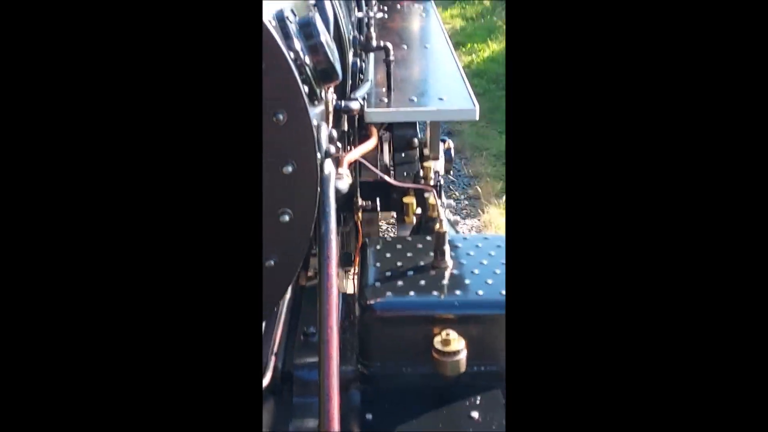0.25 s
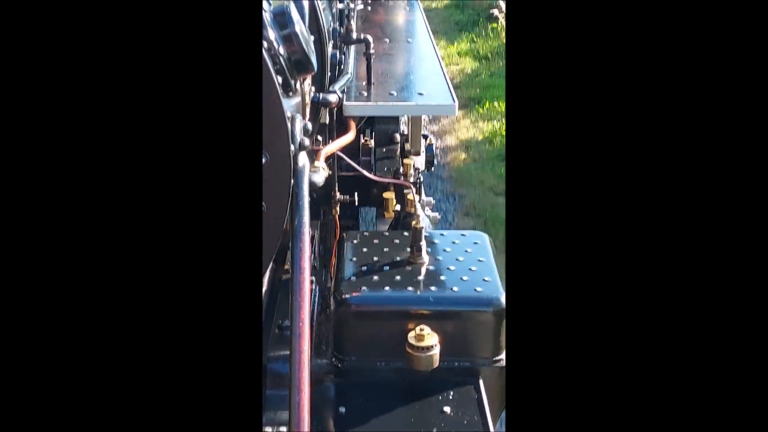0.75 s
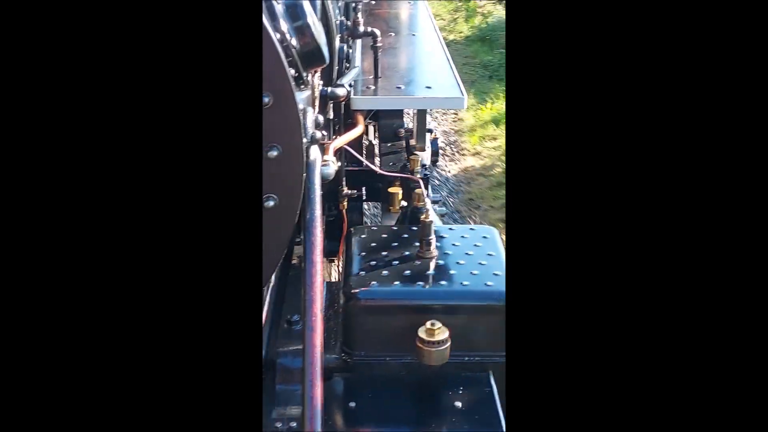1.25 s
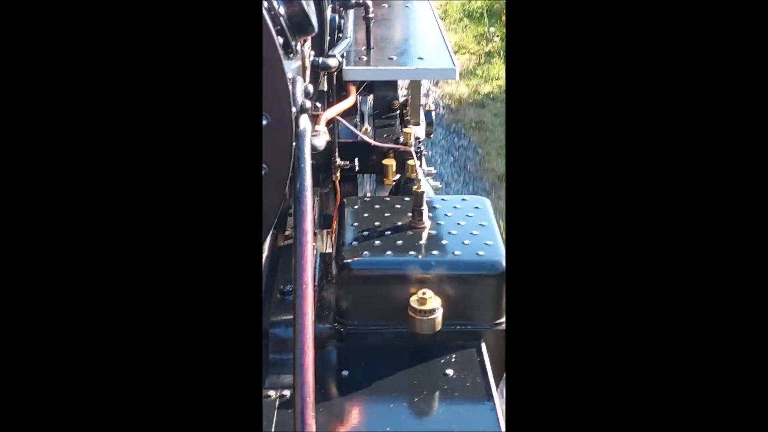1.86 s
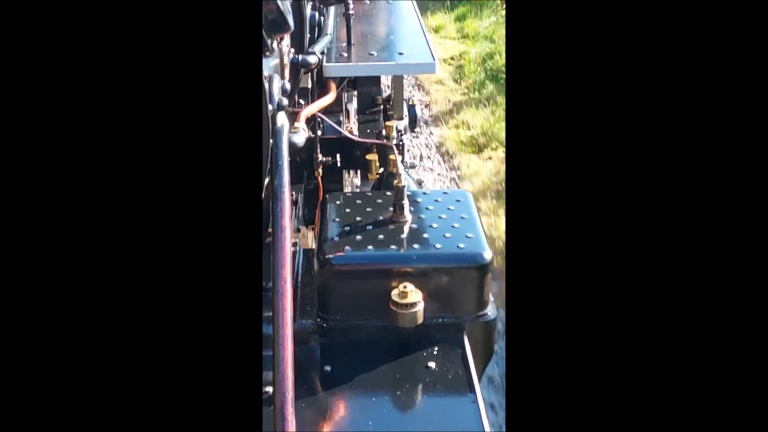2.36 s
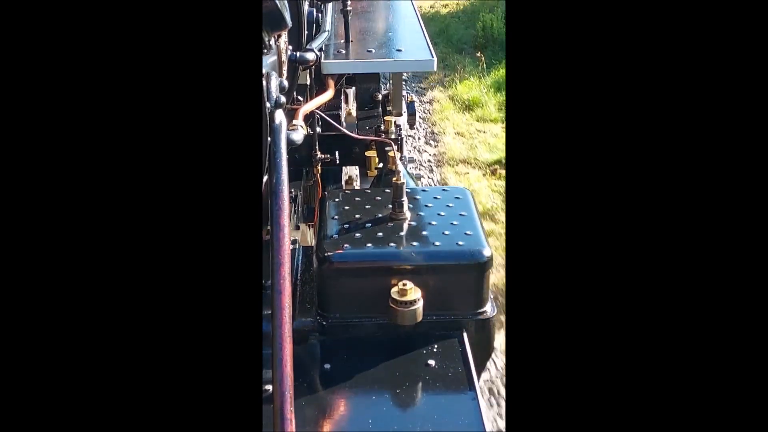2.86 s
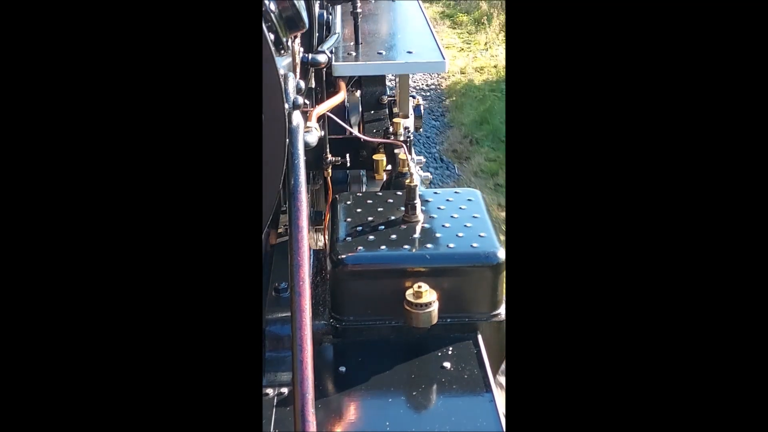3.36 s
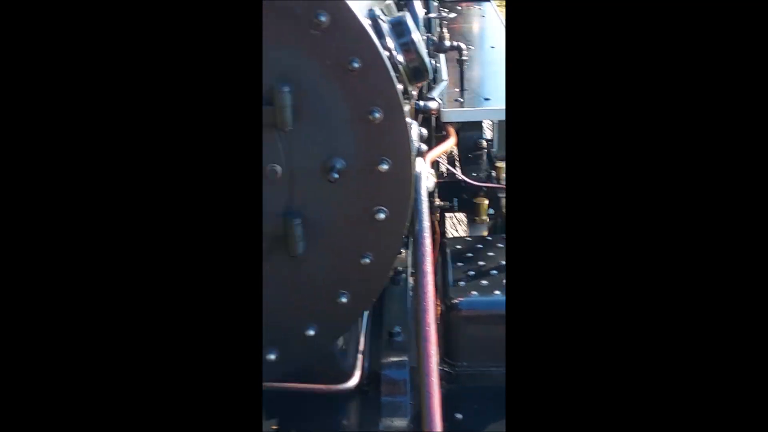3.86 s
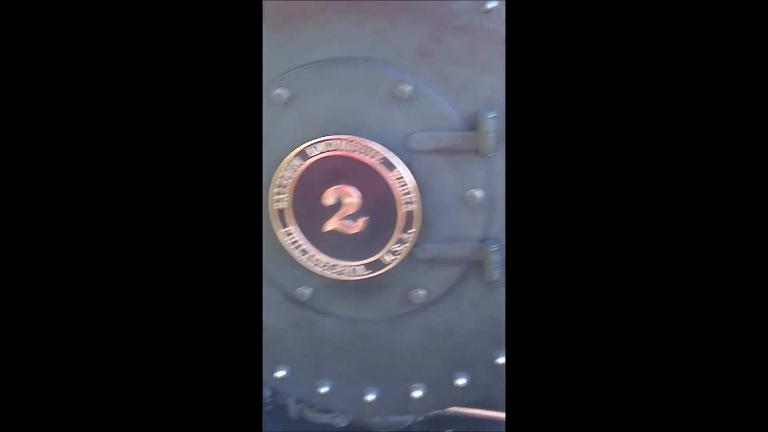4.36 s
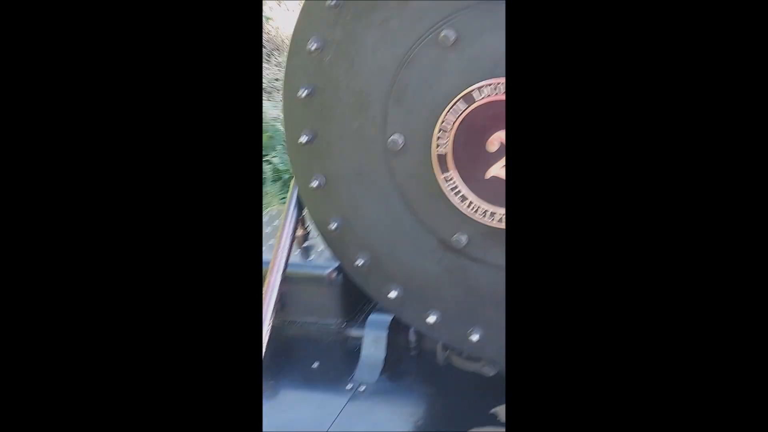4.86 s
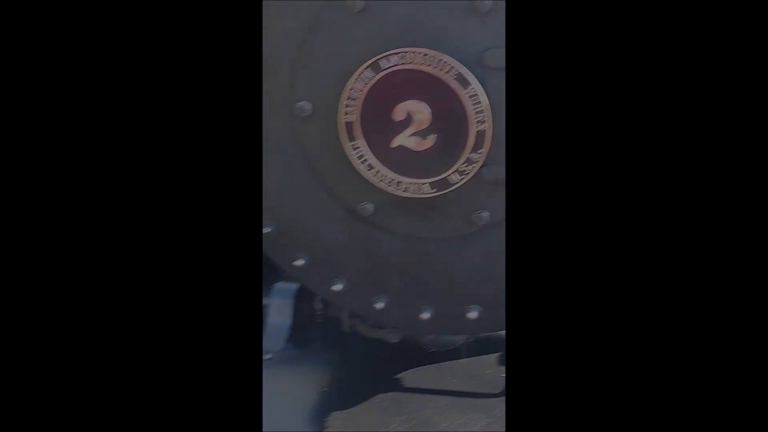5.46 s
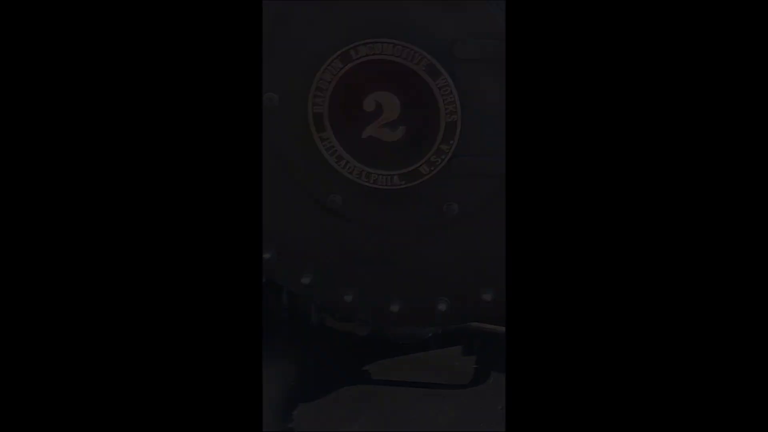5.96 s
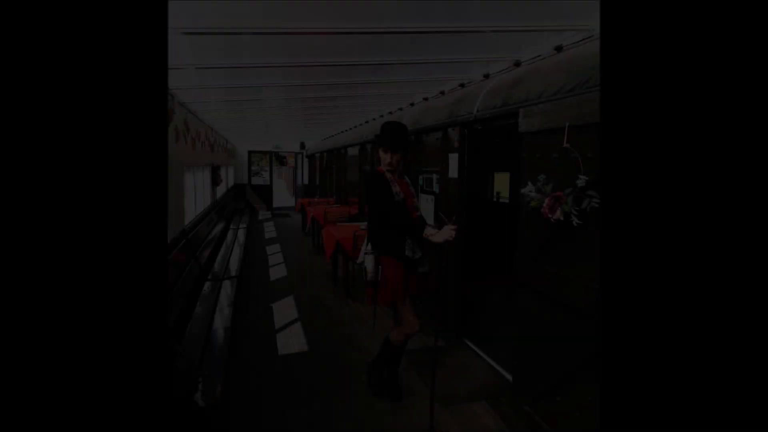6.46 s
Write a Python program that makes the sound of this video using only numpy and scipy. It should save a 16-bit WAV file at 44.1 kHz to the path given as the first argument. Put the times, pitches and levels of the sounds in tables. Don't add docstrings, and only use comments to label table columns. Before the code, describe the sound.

From the start, a small steam engine is already rolling, heard close at its front in open air. Rough wheel roar, busy rod rattle, thin sputtering steam and lumpy frame rumble run continuously. Dull slack bumps lead to hard steel bangs at 0.5-0.9 s, the sharpest near 0.84, then a ringing clank at 1.03 and a loose bracket chattering at 1.15-1.35. Another clattering blow comes around 1.5; rolling swells near 1.8, then eases. Crisp knocks stand out at 2.24, 2.75 with a bright pin-like ping, and 3.2. After that, softer bumps and steam spurts dominate, with a double metallic hit at 4.45. All the while the level fades evenly; from 5 s only faint rumble, hiss and tiny link rattles remain, stopping dead at about 6.06 into silence. The engine is on the right only; the left has faint circuit hiss.

```python
import sys
import numpy as np
from scipy import signal
from scipy.fft import rfft, irfft
from scipy.io import wavfile
from scipy.ndimage import uniform_filter1d

SR = 44100
rng = np.random.default_rng(int(sys.argv[2]) if len(sys.argv) > 2 else 0)


def store_wav(level_fs):
    pcm = np.round(np.clip(np.atleast_2d(level_fs), -1, 1) * 32767)
    wavfile.write(sys.argv[1], SR, pcm.T.astype(np.int16))


N = 295470
T = np.arange(N) / SR
FADE = np.clip(1 - T / 6.25, .01, 1)

# start in [s], peak in [dB], ringing pitch in [Hz], treble in [dB].
JOINTS = [(0.393, -22.5, 423, -3.5), (0.513, -15.5, 386, -13), (0.672, -15, 420, -15),
          (0.72, -15, 610, -13), (0.829, -11, 656, -8), (0.889, -37, 754, -5), (1.027, -15, 420, -6),
          (1.166, -23, 652, -7), (1.372, -50, 575, -11), (1.482, -20, 640, -5), (1.67, -28.5, 610, -4),
          (2.238, -23.5, 790, 1), (2.41, -23.5, 414, -4.5), (2.735, -22, 403, -10),
          (2.755, -14.5, 820, -25), (2.964, -23, 454, -12), (3.214, -16.5, 640, -12),
          (3.373, -34.5, 520, 3), (3.559, -49, 610, 4), (3.605, -27.5, 420, -1), (4.259, -23.5, 363, -20),
          (4.439, -26, 780, -12), (4.459, -19, 780, -23), (4.807, -41, 286, 0), (5.081, -27.5, 428, -22),
          (5.413, -54, 396, 3), (5.662, -44, 684, -2), (5.985, -38, 425, -16.5)]
# start in [s], peak in [dB], ringing pitch in [Hz],
# treble in [dB].
SLACK = [(0.004, -20, 420, -17), (0.069, -16.5, 310, -26), (0.202, -21, 313, -27),
         (0.614, -24.5, 595, -32.5), (0.966, -23.5, 310, -25), (1.558, -14.5, 608, -26),
         (1.803, -34, 1094, -12), (2.27, -18, 707, -14), (2.511, -33, 357, -14), (2.588, -26, 720, -27),
         (2.86, -20.5, 325, -14.5), (3.058, -24.5, 602, -10.5), (3.104, -37, 577, -27),
         (3.315, -18.5, 328, -17), (3.788, -29, 406, -35), (3.933, -20, 685, -33), (3.985, -22, 610, -28),
         (4.546, -18, 310, -30), (4.622, -27, 900, -12), (4.668, -20.5, 276, -22), (4.915, -25.5, 380, -20),
         (4.991, -30.5, 387, -32), (5.15, -26.5, 390, -18), (5.259, -49, 660, -24), (5.329, -30, 265, -25),
         (5.603, -40, 760, -33), (5.887, -41.5, 408, -29)]
# frequency in [Hz], strength in [dB].
CRACK = [(1000, -40), (2000, 11.5), (3000, 8), (4500, 0.5), (8000, -6.5), (13000, -17.5), (16500, -18.5)]


def gain_of(db):
    return 10 ** (np.asarray(db) / 20)


def evened(x):
    return x / np.sqrt(np.mean(x ** 2) + 1e-20)


def colour(x, points):
    f, db = np.transpose(points)
    hz = np.fft.rfftfreq(len(x), 1 / SR)
    curve_db = np.interp(np.log(hz + 1), np.log(f + 1), db)
    return irfft(rfft(x) * gain_of(curve_db), len(x))


def resonate(x, hz, width):
    r = np.exp(-np.pi * width / SR)
    return signal.lfilter([1 - r, 0, r - 1], [1, -2 * r * np.cos(2 * np.pi * hz / SR), r * r], x)


def patchy(patch_db, bins, frames, size=512):
    a, b, patches = rng.standard_normal((N // (size // 4) + 5, size // 2 + 1, 3)).T
    patches = uniform_filter1d(patches, int(bins), 0)
    patches = evened(uniform_filter1d(patches, int(frames), 1))
    z = (a + 1j * b) * gain_of(patch_db * patches)
    return evened(signal.istft(z, nperseg=size, noverlap=size - size // 4)[1][:N])


def taps(per_s, spread_db):
    size = gain_of(spread_db * np.minimum(rng.exponential(1, N), 4))
    sign = rng.choice([-1, 1], N)
    return evened(size * sign * (rng.random(N) < per_s / SR))


def swell(count, rise):
    u = np.linspace(0, 1, count)
    return np.sin(np.pi * u ** rise) ** 2


def humps(rows):
    return sum(db * np.exp(-((T - s) / half) ** 2) for s, half, db in rows)


def add(mix, s, sound):
    part = mix[max(round(s * SR), 0):][:len(sound)]
    part += sound[:len(part)]


def level(db, roll, leak, load=0):
    # time in [s], rolling level in [dB], steam leak in [dB], wheel load in [dB].
    ride = [(0.0, -26, 0.5, 2), (0.18, -28.5, 0.5, 0), (0.33, -27, 0.5, -1.5), (0.87, -25.5, -2, -1),
            (1.33, -28.5, -0.5, -3), (1.6, -27, -2, 1), (1.8, -23, 1.5, -4), (1.97, -28.5, 1, -0.5),
            (2.25, -34.5, -0.5, 0), (2.48, -29.5, 0, 1), (3.04, -33, -1, -1), (3.45, -33.5, 0, 2),
            (3.7, -34, 1.5, -1.5), (4.0, -33.5, -2, -1.5), (4.45, -36, -0.5, 1.5), (4.63, -43.5, 1.5, 2.5),
            (5.4, -42.5, -1.5, -3), (5.9, -49, -1, -0.5)]
    usual_roll_db = -30
    s, roll_db, leak_db, load_db = np.transpose(ride)
    swing_db = roll_db - 20 * np.log10(np.interp(s, T, FADE)) - usual_roll_db
    return FADE * gain_of(db + np.interp(T, s, roll * swing_db + leak * leak_db + load * load_db))


def jolt(treble, db, length_s, early_s):
    out, hump = np.ones(N), swell(int(length_s * SR), 0.64)
    for s, peak_db, hz, treble_db in JOINTS + SLACK:
        add(out, s - early_s, gain_of(db + peak_db + treble * treble_db) / FADE[round(s * SR)] * hump)
    return out


def wheels():
    # frequency in [Hz], strength in [dB per Hz].
    roar = [(100, -39.5), (170, -10), (220, -8.5), (297, 6.5), (451, 0.5), (524, 2), (595, 7), (699, 6.5),
            (1080, 2.5), (1400, -14.5), (2200, -4), (2860, -39.5), (4840, -120)]
    # pitch in [Hz], width in [Hz], strength in [dB].
    resonances = [(97, 7.1, -12.5), (310, 48, -5.5), (420, 68, 1.5), (600.5, 37, -7.5), (770, 6.4, -11),
                  (1147, 34, -8.5), (1653, 65, -14)]
    rough = patchy(2.2, 7.4, 20) + 0.45 * taps(600, 4.3)
    hop = 441
    drift = uniform_filter1d(rng.standard_normal((len(resonances), N // hop + 2)), size=9, axis=1)
    rings = np.zeros(N)
    for (hz, width, db), d in zip(resonances, drift):
        swelling = gain_of(2.1 * np.interp(T, np.arange(len(d)) * hop / SR, evened(d)))
        rings += gain_of(db) * evened(resonate(rough, hz, width) * swelling)
    rolling = evened(evened(colour(rough, roar)) + 0.65 * rings)
    shaken = jolt(treble=0.22, db=9.5, length_s=0.085, early_s=.01)
    return level(-31, roll=0.64, leak=0, load=0.93) * shaken * rolling


def rods():
    # frequency in [Hz], strength in [dB per Hz].
    rattle = [(590, -25.5), (1000, 4.5), (1110, 0), (1400, -0.5), (1710, 1.5), (2660, -1.5), (3100, -5.5),
              (3550, -11.5), (4160, -15.5), (7000, -22), (9100, -54.5), (15400, -120)]
    blur = rng.standard_normal(900) * np.exp(-np.arange(900) / 150)
    impacts = evened(signal.oaconvolve(taps(250, 1.97), blur)[:N])
    shake = patchy(1.8, 12, 10) + 0.6 * impacts
    shaken = jolt(treble=0.99, db=22.5, length_s=.055, early_s=0.0058)
    return level(-37, roll=0.92, leak=.1) * shaken * evened(colour(shake, rattle))


def steam():
    # frequency in [Hz], strength in [dB per Hz].
    hiss_spectrum = [(2060, -25.5), (3500, 0.5), (4530, 0.5), (9000, -6.5), (13700, 0.5), (14800, -2.5),
                     (16000, -2.5), (17500, -29.5)]
    # peak time in [s], rise and fall time in [s], lift above the steady hiss in [dB].
    puffs = [(.08, 0.026, 1.5), (.53, 0.034, 3.5), (.73, 0.035, 3.5), (.843, 0.018, 8.5), (.97, 0.046, 3),
             (1.047, 0.016, 4), (1.51, 0.04, 7), (1.7, 0.089, 3.5), (1.98, 0.0062, 3), (2.255, 0.067, 5),
             (2.43, 0.035, 4), (2.75, 0.022, 6), (2.96, 0.033, 4.5), (3.03, 0.017, 5), (3.075, 0.019, 3.5),
             (3.22, 0.022, 8.5), (3.615, 0.055, 5), (3.98, 0.046, 3.5), (4.13, 0.065, 5),
             (4.283, 0.079, 6.5), (4.443, .015, 4.5), (4.47, 0.018, 10), (4.56, 0.019, 0),
             (4.822, 0.012, 6.5), (5.11, 0.057, 2.5), (5.24, .025, 6.5), (5.46, .04, 4), (5.7, 0.021, 2),
             (6.0, 0.046, 2)]
    spurt = level(-39.5, roll=0.14, leak=1) * gain_of(humps(puffs))
    return spurt * evened(colour(patchy(2.2, 9.1, 11) + 0.45 * taps(1400, 4), hiss_spectrum))


def frame():
    # frequency in [Hz], strength in [dB per Hz].
    rumble = [(12, -45), (28, -21), (70, -0.5), (140, 1.5), (182, -10.5), (260, -3), (340, -36.5),
              (570, -120)]
    # centre in [s], length in [s], lift above the steady rumble in [dB].
    lurches = [(0.134, 0.16, 5.5), (0.415, 0.03, 4), (0.61, 0.15, 6.5), (0.8, 0.18, 4.5),
               (1.198, 0.13, 0.5), (1.52, 0.086, -0.5), (1.83, 0.25, 7), (2.49, 0.28, 5.5),
               (2.731, 0.096, 11), (2.88, 0.037, 9), (3.05, 0.097, 7.5), (3.386, 0.17, 5),
               (3.678, 0.27, 10.5), (4.255, 0.29, 6.5), (4.664, 0.38, 7.5), (4.933, 0.047, 8),
               (5.157, 0.14, 7), (5.35, 0.071, 6), (5.606, 0.44, 4.5), (6.03, 0.16, 9)]
    lurch_db = humps([(s, length / 2, db) for s, length, db in lurches])
    shaking = evened(colour(patchy(2.3, 3.6, 6.2, size=2048), rumble))
    return FADE * gain_of(-37 + lurch_db) * shaking


def knocks():
    # frequency in [Hz], strength in [dB per Hz].
    blow = [(60, 5), (200, 8.5), (500, 6), (1200, 5.5), (2000, -7), (3500, -23)]
    out = np.zeros(N)
    blows = [(*row, .05, 0.77) for row in JOINTS] + [(*row, .046, 0.85) for row in SLACK]
    for s, db, hz, treble_db, length, ring in blows:
        noise = rng.standard_normal((4, 8192))
        count = int(length * SR)
        body = evened(colour(noise[0], blow))
        tone = resonate(noise[1], hz, 34)
        grit = gain_of(1.6 * evened(uniform_filter1d(noise[3], 90)))
        crack = gain_of(treble_db - 1.0) * evened(colour(noise[2] * grit, CRACK))
        add(out, s - .004, gain_of(db - 7.5) * swell(count, 0.39) * (1 - ring) * body[-count:])
        add(out, s - .002, gain_of(db - 9.0) * swell(count, .9) ** 1.9 * crack[-count:])
        count = int(1.1 * count)
        add(out, s - .003, gain_of(db - 13.5) * swell(count, 0.37) * ring * evened(tone[-count:]))
    return out


def clinks():
    # start in [s], length in [s], pitch in [Hz], level in [dB].
    clanks = [(.195, 0.049, 1137, -31.5), (0.283, 0.087, 1130, -37), (.51, 0.083, 380, -30),
              (.74, 0.037, 1158, -36.5), (0.845, 0.028, 621, -20.5), (.838, 0.022, 1103, -28.5),
              (1.052, 0.024, 760, -25), (1.024, 0.02, 780, -30), (1.47, 0.032, 526, -27.5),
              (1.49, 0.05, 625, -27), (2.733, .05, 62, -31.5), (2.749, 0.037, 611, -26.5),
              (2.75, 0.03, 786, -27), (3.216, 0.033, 699, -34.5), (3.936, 0.081, 1120, -37),
              (4.462, 0.028, 783, -30.5), (4.461, 0.018, 610, -30), (4.206, 0.026, 293, -36)]
    # start in [s], length in [s], pitch in [Hz], width in [Hz], level in [dB].
    chatter = [(0.519, 0.056, 2440, 600, -30.5), (0.667, 0.069, 2450, 604, -31),
               (0.821, 0.02, 2600, 500, -28), (1.15, 0.12, 1660, 60, -34), (0.71, 0.038, 2330, 500, -32),
               (0.162, 0.052, 340, 60, -28.5), (1.676, 0.063, 1870, 80, -34.5),
               (3.357, 0.051, 2680, 69, -40), (4.28, 0.028, 6050, 600, -43),
               (1.045, 0.059, 3100, 199, -38.5), (4.649, 0.035, 2400, 350, -44),
               (4.82, 0.026, 2300, 250, -46), (5.082, 0.11, 2140, 400, -48.5),
               (5.108, 0.062, 4800, 810, -49), (5.334, 0.022, 2040, 300, -52), (5.412, .03, 2170, 350, -50),
               (5.64, 0.09, 5500, 2500, -59)]
    out = np.zeros(N)
    heavy = [(s, length, hz, 0.038 * hz, db, .3) for s, length, hz, db in clanks]
    light = [(*row, 3.5) for row in chatter]
    for s, length, hz, width, db, broken_db in heavy + light:
        hump = np.sqrt(swell(int(length * SR), 0.72))
        noise = rng.standard_normal((2, 12000))
        tone = resonate(resonate(noise[0], hz, width), hz, 2 * width)
        tone = tone / abs(signal.hilbert(tone)) ** .6
        tone = tone * gain_of(broken_db * evened(uniform_filter1d(noise[1], 200)))
        add(out, s - .004, gain_of(db) * hump * evened(tone[-len(hump) - 500:-500]))
    return out


def ticks():
    # time in [s], peak in [dB].
    contacts = [(0.517, -30), (0.6687, -18), (0.833, -14.5), (0.8388, -9), (0.845, -13), (0.8934, -27.5),
                (0.925, -17.5), (1.0328, -16.5), (1.039, -20.5), (1.1654, -23), (1.298, -29), (1.3526, -32),
                (1.373, -23.5), (1.4354, -22), (1.674, -29.5), (1.796, -28.5), (1.8836, -19), (1.926, -20),
                (2.2327, -16), (2.7405, -22), (2.748, -36), (3.1927, -25), (3.217, -23), (3.3686, -21),
                (3.609, -26), (3.625, -22), (4.4398, -23), (4.46, -24), (4.467, -15)]
    out, t = np.zeros(N), np.arange(600) / SR
    for s, db in contacts:
        snap = evened(colour(rng.standard_normal(2048), CRACK))[:600]
        add(out, s - .001, gain_of(db - 10.0 - 60 * t / 0.027) * np.minimum(t / 0.001, 1) * snap)
    return out


def pings():
    # time in [s], peak in
    # [dB], # pitch in [Hz], time to fall 60 dB in [s].
    bounces = [(1.150, -29.5, 1650, .06), (1.161, -30, 1620, 0.055), (1.174, -18.5, 1658, 0.09),
               (1.189, -25.5, 1630, 0.07), (1.2, -25, 1610, 0.07), (1.209, -24, 1690, 0.065),
               (1.216, -24, 1715, .07), (1.228, -29.5, 1690, 0.06), (1.242, -26, 1690, .06),
               (1.255, -24, 1623, .06), (1.346, -27, 1620, .07), (1.372, -27, 1608, .04),
               (1.214, -31, 2800, .04), (1.256, -29, 2654, .07), (1.295, -28, 2630, .06),
               (1.317, -32, 2655, .05), (1.329, -34, 2590, .05), (1.351, -34, 2640, .05),
               (1.469, -32.5, 3200, .1), (1.474, -30, 3100, .06), (1.487, -34, 2900, .09),
               (1.477, -42, 5750, .1), (1.492, -35.5, 5890, .1), (1.477, -23, 290, 0.217),
               (1.453, -30.5, 2050, 0.059), (.838, -20.5, 2700, 0.055), (.839, -35.5, 12600, .03),
               (.824, -30, 2700, 0.06), (.99, -32.5, 2900, .06), (1.018, -22, 1320, .08),
               (1.021, -19, 570, .08), (1.034, -11.5, 768, .1), (3.202, -42, 6800, 0.1),
               (3.202, -46, 10300, 0.092), (3.202, -44, 6100, .08), (4.439, -29, 2600, 0.032),
               (4.46, -40, 7400, .04), (4.468, -35, 6800, .06), (4.468, -42, 8300, 0.037),
               (2.755, -24, 900, 0.095), (2.741, -19, 260, .07), (.8385, -21, 2300, 0.055),
               (.846, -21.5, 1500, .05), (4.46, -23, 710, 0.073), (1.5, -29, 2500, .06),
               (1.469, -26, 470, .12), (1.25, -29, 1140, .12), (4.928, -30, 480, 0.14),
               (5.488, -46, 410, .4), (5.655, -43, 2100, .1)]
    # time in [s], peak in [dB], # pitch in [Hz],
    # time to fall 60 dB in [s].
    more_bounces = [(0.001, -21, 680, .2), (.565, -22, 470, .1), (.855, -19, 420, .1), (1.027, -27, 2600, .07),
                    (1.037, -26, 1430, .05), (1.474, -20, 586, .08), (1.470, -33, 3400, .08),
                    (1.499, -22, 690, .06), (1.513, -22, 720, .08), (1.484, -31, 2120, .1),
                    (1.498, -38, 5800, .06), (1.272, -37, 3140, .05), (1.172, -32, 2010, .06),
                    (2.746, -18, 300, .05), (2.741, -26, 600, .04), (3.215, -24, 900, .04),
                    (3.221, -24, 520, .06), (4.462, -24, 790, .06), (4.626, -33, 1000, .05),
                    (4.628, -38, 1700, .06), (4.675, -41, 2300, .05), (5.39, -47, 2050, .06),
                    (5.494, -46, 2050, .1), (5.532, -47, 2250, .06), (5.592, -50, 2200, .07),
                    (5.677, -43, 2000, .06), (5.678, -48, 2750, .05), (5.372, -44, 1100, .05),
                    (5.336, -43, 2050, .06), (5.656, -46, 2050, .05), (4.65, -38, 2450, .06),
                    (4.826, -40, 2350, .05), (4.552, -27, 340, .07), (1.213, -25, 1700, .08),
                    (1.296, -31, 2660, .08), (1.471, -35, 3300, .12), (1.488, -37, 5950, .09),
                    (2.59, -29, 720, .08), (1.672, -30, 1900, .07), (1.7, -30, 1720, .1), (.345, -25, 280, .12),
                    (.832, -22, 2500, .04), (1.125, -28, 1170, .08), (2.741, -17, 170, .08),
                    (2.768, -25, 800, .12), (3.21, -25, 640, .05), (1.316, -34, 2620, .1),
                    (.695, -29, 2700, .08), (.53, -30, 2750, .08)]
    # pitch in [Hz], level in [dB], time to fall 60 dB in [s].
    pin_tones = [(4480, -2.5, 0.1), (5660, -3.5, 0.066), (7040, -4.5, .08), (8010, -4.5, 0.043),
                 (11000, -5.5, .04), (12000, -1, .04), (13200, -4, .06), (14700, 0, .04)]
    # time in [s], peak in [dB].
    pin_hits = [
        (2.7403, -35),
        (4.4405, -49),
        (4.4685, -47),
    ]
    out, t = np.zeros(N), np.arange(6000) / SR
    pin = [(s, db + tone_db, hz, t60) for s, db in pin_hits for hz, tone_db, t60 in pin_tones]
    rows = bounces + pin + more_bounces
    for (s, db, hz, t60), (a, b, apart) in zip(rows, rng.random((len(rows), 3))):
        twin_hz = hz + (2 * apart - 1) * 90
        tone = np.sin(2 * np.pi * (hz * t + a)) + .3 * np.sin(2 * np.pi * (twin_hz * t + b))
        onset = 1 - np.exp(-t * hz / 3.0)
        add(out, s, gain_of(db - 60 * t / t60) * onset * tone)
    return out


def circuit():
    # frequency in [Hz], strength in [dB per Hz].
    hiss_spectrum = [(20, -4), (120, 0), (400, -9), (1400, -17), (3000, -22), (5900, -25), (6300, -19),
                     (10500, -24), (12000, -22), (16000, -24)]
    return gain_of(-75.5) * FADE * evened(colour(rng.standard_normal(N), hiss_spectrum))


def scene():
    # centre in [s], length in [s], how much quieter in [dB].
    gaps = [
        (1.015, .016, 11),
        (2.726, .026, 9),
        (3.193, .024, 7),
        (4.453, .01, 7),
    ]
    quieter_db = humps([(s, length / 2, db) for s, length, db in gaps])
    rolling = (wheels() + rods()) / gain_of(quieter_db)
    leaking = steam() / gain_of(.6 * quieter_db)
    engine = rolling + leaking + frame() + knocks() + clinks() + ticks() + pings()
    return np.array([circuit(), 2 * engine])


def camera_rounding(x):
    # frequency in [Hz], step as a share of the local rms in [ratio].
    coarse = [(300, 0.045), (1500, .14), (4700, 0.37), (7000, 0.55), (7700, 0.9), (9200, 1.0),
              (10200, 0.66), (12000, 0.42), (14300, 0.52), (15500, 0.85)]
    # centre in [s], half length in [s], step change in [dB].
    spare = [(.7, .05, -4), (.84, .03, -8), (1.028, .015, -8), (1.53, .04, -5), (1.77, .13, -6),
             (2.24, .06, -5), (2.745, .025, -8), (3.21, .03, -8), (3.45, .2, -5), (4.45, .06, -7),
             (5.5, .08, -5), (6.06, .03, -10)]
    size, grid, top_hz, uneven_db = 1024, 746, 15790, 6.5
    n, k = np.arange(2 * size), np.arange(size)
    window = np.sin(np.pi * (n[:, None] + .5) / (2 * size))
    basis = np.cos(np.pi / size * np.outer(n + .5 + size / 2, k + .5)) * window * np.sqrt(2 / size)
    count, lead = N // size + 3, size - grid % size
    blocks = np.pad(x, (lead, count * size - N - lead)).reshape(count, size)
    terms = np.hstack([blocks[:-1], blocks[1:]]) @ basis
    hz = (k + .5) * SR / (2 * size)
    power = uniform_filter1d(terms ** 2, size=120, axis=1)
    local = np.sqrt(abs(uniform_filter1d(power, size=35, axis=0)))
    uneven = evened(uniform_filter1d(rng.standard_normal((count - 1, size // 4)), size=4, axis=0))
    uneven = np.repeat(uneven, 4, axis=1)
    spare_db = humps(spare)[np.clip(np.arange(1, count) * size - lead, 0, N - 1)]
    step = np.interp(hz, *np.transpose(coarse)) * local
    step = step * gain_of(uneven_db * uneven + spare_db[:, None]) + 1e-9
    terms = np.sign(terms) * np.floor(abs(terms) / step + .42) * step * (hz < top_hz)
    halves = terms @ basis.T
    joined = np.pad(halves[:, :size], ((0, 1), (0, 0))) + np.pad(halves[:, size:], ((1, 0), (0, 0)))
    return joined.ravel()[lead:lead + N]


def band_limit(x):
    return signal.sosfilt(signal.butter(12, 16590, fs=SR, output="sos"), x)


def record(dry):
    ceiling, cut_s, tail_s = 1.3, 6.063, .012
    rounded = ceiling * np.tanh(dry / ceiling)
    stored = np.array([camera_rounding(x * (T < cut_s)) for x in rounded])
    ending = np.clip((cut_s - T) / tail_s + 1, 0, 1)
    return band_limit(stored * ending)


dry = scene()
out = record(dry)
store_wav(out)
```